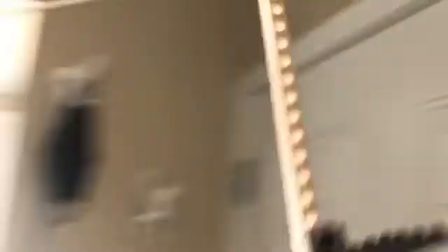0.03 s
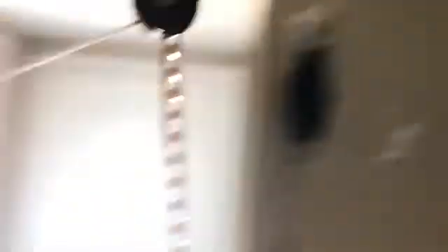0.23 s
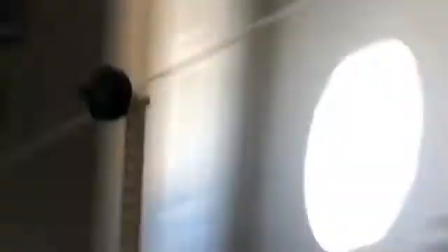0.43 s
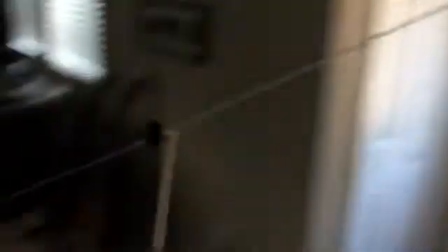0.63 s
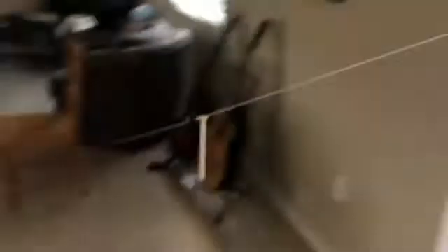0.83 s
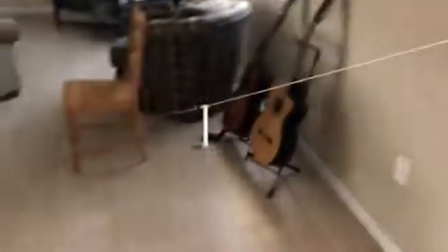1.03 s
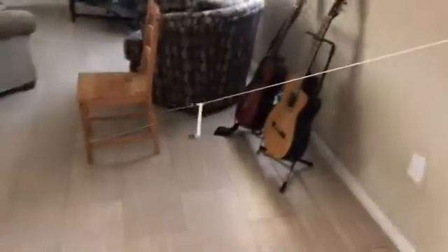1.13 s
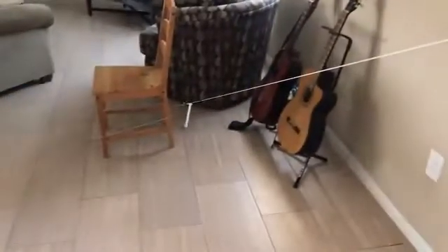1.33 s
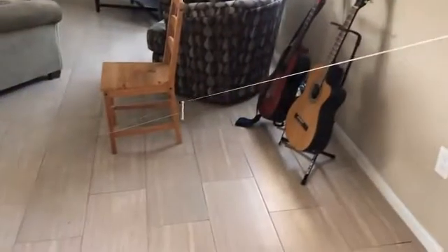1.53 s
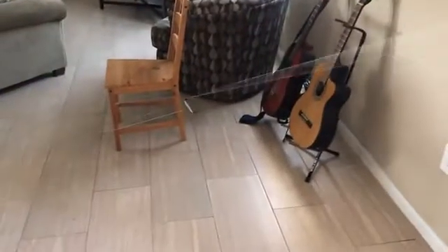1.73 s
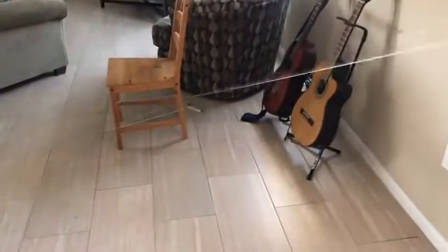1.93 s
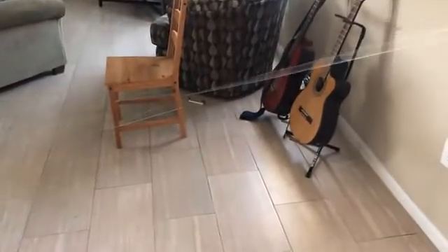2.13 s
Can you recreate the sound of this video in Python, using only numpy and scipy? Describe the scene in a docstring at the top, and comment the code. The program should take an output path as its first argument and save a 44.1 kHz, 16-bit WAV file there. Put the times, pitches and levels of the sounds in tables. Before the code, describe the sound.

Small pulley toy zips along a string with a faint rising whine, ending in sharp plastic clacks

```python
"""A plastic toy hangs from a small pulley and rolls down a taut string across a hard-floored room.
First the wheel whines, climbing in pitch, and the rubbed string sings; both are gliding sine tones.
Noise hisses in the groove near the microphone, and ticks ring the pulley; soft handling bumps intrude.
At 1.58 s the toy hits a wooden chair, then a piece clatters, rocks and rattles to rest on the floor:
decaying modes and noise cracks, followed by a diffuse room tail."""
import sys
import numpy as np
from scipy import signal
from scipy.fft import rfft, irfft
from scipy.io import wavfile

SR = 44100
rng = np.random.default_rng(int(sys.argv[2]) if len(sys.argv) > 2 else 0)


def transcribe(signal):
    """Save signal, clipped to [-1, 1], as a 16-bit WAV file at the path in sys.argv[1]."""
    frames = np.atleast_2d(signal).T
    limited = np.clip(frames, -1, 1)
    pcm = np.round(limited * 32767).astype(np.int16)
    wavfile.write(sys.argv[1], SR, pcm)


N = 95873
TIME = np.arange(N) / SR

# The wheel rubs its frame. Each row: centre in seconds, bell half length (sigma) in seconds, level in dB.
SCUFFS = [(0.279, 0.016, -57), (0.382, 0.0085, -51.5), (0.765, 0.014, -68), (.893, 0.015, -66),
          (1.207, 0.0058, -72), (1.352, 0.014, -69.5)]
# The toy strikes the chair. Each row: start in seconds, body level in dB, crack level in dB,
# lowest ringing frequency in Hz.
CHAIR_HITS = [(1.5800, -17, -28, 860), (1.5824, -18, -23, 2510), (1.5872, -31.5, -40, 908)]
# The loose piece clatters. Each row: start in seconds, body level in dB, crack level in dB,
# lowest ringing frequency in Hz.
FLOOR_HITS = [(1.8481, -26.5, -39, 810), (1.8505, -28.5, -35.5, 960), (1.8601, -47, -54, 1320),
              (1.871, -44, -32, 3000), (1.8735, -51, -30.5, 3000), (1.8778, -55, -40, 2960),
              (2.126, -62, -47, 3000)]
# Modes of the piece on the floor. Each row: frequency in Hz, relative level in dB, T60 in seconds.
FLOOR_MODES = [(1127, -16.5, 0.026), (1464, -8, 0.02), (2080, -14, 0.016), (2360, -8.5, 0.02),
               (2614, 1, 0.022), (3370, -13, 0.0096), (4100, -9.5, 0.025), (4440, -8, 0.012)]
# Colour of a contact on the floor. Each row: frequency in Hz, relative density in dB per Hz.
FLOOR_CRACK = [(100, -31), (800, -33), (2500, -1), (4500, 1.5), (6500, 0), (9500, -3), (13500, -3)]


def from_db(db):
    """Decibels to gain."""
    return 10 ** (np.asarray(db) / 20)


def rms_one(x):
    """Scale to unit power."""
    return x / np.sqrt(np.mean(x ** 2) + 1e-20)


def in_time(rows):
    """A control curve at every sample, straight between its points."""
    return np.interp(TIME, *np.transpose(rows))


def at_hz(points, hz):
    """Read a spectrum on a log-frequency axis."""
    f, value = np.transpose(points)
    return np.interp(np.log(hz + 1e-9), np.log(f), value)


def drift(rate_hz):
    """Smooth random wander of unit power: white noise through a two-pole low-pass."""
    r = np.exp(-2 * np.pi * rate_hz / SR)
    wander = signal.lfilter([1], [1, -2 * r, r * r], rng.standard_normal(2 * N))
    return rms_one(wander[N:])  # the first half lets the filter settle


def unsteady_tone(phase, rate_hz):
    """A tone whose two quadratures wander separately, so strength and phase both waver."""
    return drift(rate_hz) * np.sin(phase) + drift(rate_hz) * np.cos(phase)


def noise(spectrum):
    """Coloured stereo noise of unit power, nearly mono below the treble."""
    # Stereo width. Each row: frequency in Hz, side over mid in dB.
    width = [(3000, -26), (4500, -13), (8000, -9), (14000, -8)]
    hz = np.fft.rfftfreq(N, 1 / SR)
    mid, side = rfft(rng.standard_normal((2, N))) * from_db(at_hz(spectrum, hz))
    side = side * from_db(at_hz(width, hz))
    return rms_one(irfft([mid + side, mid - side], N))


def high_pass(x, hz, order=2):
    """Remove what lies below a frequency."""
    sos = signal.butter(order, hz, "high", fs=SR, output="sos")
    return signal.sosfilt(sos, x + 1e-18)


def swells(rows):
    """Brief bell-shaped swells, as a gain."""
    return sum(from_db(db) * np.exp(-.5 * ((TIME - s) / half) ** 2) for s, half, db in rows)


def since(start):
    """Seconds since a moment, zero before it."""
    return np.maximum(TIME - start, 0)


def dying(start, t60):
    """Exponential decay from a moment on."""
    return (TIME >= start) * from_db(-60 * since(start) / t60)


def ring(start, hz, t60):
    """A struck mode: a decaying sine."""
    return dying(start, t60) * np.sin(2 * np.pi * hz * (TIME - start))


def spread(x, width_db):
    """Widen or narrow a stereo sound by scaling its difference from the mid."""
    mid = x.mean(axis=0)
    return mid + from_db(width_db) * (x - mid)


def room_air():
    """Steady coloured room noise that fades in at the start."""
    # Colour of the air. Each row: frequency in Hz, relative density in dB per Hz.
    air_colour = [(25, -27), (60, 2.5), (100, -3.5), (200, -4.5), (500, -9.5), (1000, -12.5), (2500, -20),
                  (6000, -23.5), (14000, -38)]
    level_db, fade_s, start_offset_db = -66, 0.24, -14.5
    fade_db = start_offset_db * np.maximum(1 - TIME / fade_s, 0)
    return from_db(level_db + fade_db) * noise(air_colour)


def whine():
    """The wheel's gliding tone swells about once a turn, is roughened by the axle, and has a wall echo."""
    # Wheel speed as the pitch of its whine. Each row: time in seconds, pitch in Hz.
    pitch = [(0, 343), (.18, 484.5), (.4, 559), (.62, 808.5), (.79, 875), (.87, 1048), (.96, 1148),
             (1.14, 1151), (1.25, 1245), (1.34, 1330), (1.43, 1397), (1.58, 1365)]
    # Strength of the whine. Each row: time in seconds, level in dB.
    strength = [(0, -92), (.2, -71.5), (.38, -71.5), (.52, -76.5), (.66, -72), (.82, -73.5), (.91, -68),
                (.96, -62), (1.09, -71.5), (1.125, -61.5), (1.19, -69.5), (1.208, -52.5), (1.23, -64),
                (1.303, -67), (1.317, -55), (1.335, -64), (1.36, -57), (1.46, -68.5), (1.485, -61.5),
                (1.58, -65)]
    # Partials of the whine. Each row: multiple of the pitch, relative level in dB.
    partials = [(1, 0), (2, -18)]
    # The slow wheel runs raggedly, the fast one cleanly. Each row: time in seconds, phase jitter in rad.
    ragged = [(.7, 1.2), (.95, .3)]
    wobble, wobble_hz = 0.02405, 66.3  # relative pitch wander and its rate
    flutter_db, flutter_hz = 1.5, 37
    cycles_per_turn, turn_depth = 27, 0.69
    echo_s, echo_db = .028, -7

    hz = in_time(pitch) * (1 + wobble * drift(wobble_hz))
    phase = 2 * np.pi * np.cumsum(hz) / SR
    jitter = in_time(ragged)
    tone = 0
    for multiple, db in partials:
        gain = from_db(db + flutter_db * drift(flutter_hz))
        tone = tone + gain * np.sin(round(multiple) * phase + jitter * drift(53))
    turning = 1 + turn_depth * np.sin(phase / cycles_per_turn + drift(3.5))
    direct = tone * turning
    # the echo beats with the gliding whine
    echo = from_db(echo_db) * np.interp(TIME - echo_s, TIME, direct, left=0)
    return from_db(in_time(strength)) * rms_one(direct + echo)


def string_song(flicker_hz=15.7):
    """The taut string sings faintly under the wheel in two narrow, unsteady tones."""
    # A high and a low tone, each a list of rows. Each row: time in seconds, pitch in Hz, level in dB.
    string_tones = [
        [(0, 1369, -106), (.24, 1336, -79), (.36, 1305, -64), (.45, 1261, -68.5), (.7, 1235, -71.5),
         (.88, 1240, -76.5), (1.1, 1223, -65), (1.58, 1225, -79)],
        [(0, 465, -87.5), (.5, 497.4, -77), (1.1, 490, -83), (1.33, 463.7, -68.5), (1.45, 501.3, -68),
         (1.58, 511.4, -80)],
    ]
    out = 0
    for tone in string_tones:
        s, hz, db = np.transpose(tone)
        phase = 2 * np.pi * np.cumsum(np.interp(TIME, s, hz)) / SR
        out = out + from_db(np.interp(TIME, s, db)) * unsteady_tone(phase, flicker_hz)
    return out


def rolling():
    """The string's fibres tick under the wheel and ring the pulley, harder when the wheel rubs."""
    # Force of the rolling contact. Each row: time in seconds, level in dB.
    force = [(0, -104), (.15, -85), (.27, -79), (.4, -61.5), (.48, -69), (.7, -70.5), (.8, -71), (1, -72),
             (1.25, -68.5), (1.4, -65.5), (1.58, -67)]
    # Resonances of pulley and hanger. Each row: frequency in Hz, width in Hz, relative level in dB.
    pulley = [(470, 230, -19), (1288, 94, 2), (1810, 420, -5), (2640, 370, 2), (4120, 190, -8),
              (4340, 50, -7.5), (4910, 200, -5), (8100, 470, -12)]
    # The hanger rings in patches. Each row: centre in seconds, bell half length (sigma) in seconds,
    # level in dB.
    hanger_rings = [(.395, 0.0096, -64), (.655, 0.018, -70.5), (.79, 0.034, -71.5), (1.021, 0.0059, -66)]
    ticks_per_s, tick_spread_db = 1500, 0  # no spread: all ticks are equally strong
    flicker_db, flicker_hz = 2, 9.4
    rub_ring_db = -12.5  # pulley ringing relative to the rub's own noise
    hanger_hz, hanger_drift_hz = 2680, 36

    ticks = (rng.random(N) < ticks_per_s / SR) * rng.choice([-1, 1], N)
    ticks = ticks * from_db(tick_spread_db * np.minimum(rng.exponential(1, N), 4))
    body = 0
    for k, (hz, width, db) in enumerate(pulley):
        r = np.exp(-np.pi * width / SR)
        poles = [1, -2 * r * np.cos(2 * np.pi * hz / SR), r * r]
        mode = rms_one(signal.lfilter([1, 0, -1], poles, ticks))
        gain = from_db(db + flicker_db * drift(flicker_hz))
        body = body + (-1) ** k * gain * mode  # neighbours in opposite polarity
    drive = from_db(in_time(force)) + from_db(rub_ring_db) * swells(SCUFFS)
    hanger = unsteady_tone(2 * np.pi * hanger_hz * TIME, hanger_drift_hz)
    return drive * rms_one(body) + swells(hanger_rings) * hanger


def friction(flicker_db=1.0, flicker_hz=92):
    """Noise of the string hissing in the groove, with a few brief rubs, flickering in level."""
    # Hiss that fades with distance. Each row: time in seconds, level in dB.
    hiss_level = [(0, -82.5), (.1, -74), (.19, -63.5), (.32, -54.5), (.45, -59), (.6, -64), (.72, -68.5),
                  (1.1, -74), (1.4, -73.5), (1.58, -72)]
    # Colour of the hiss. Each row: frequency in Hz, relative density in dB per Hz.
    hiss_colour = [(200, -8), (1000, -8), (2000, -2), (3050, -5), (3500, -16), (3980, 5), (4200, 2.5),
                   (4880, 10.5), (5300, 6.5), (5850, -3), (6200, 5.5), (6700, -2.5), (7650, -4), (8100, 6),
                   (8600, -7), (9400, 0), (10450, 7.5), (11800, 8), (12450, 10), (13300, 4), (14000, 8.5)]
    # Colour of the rubs. Each row: frequency in Hz, relative density in dB per Hz.
    scuff_colour = [(400, -31), (1400, -21), (2000, -5), (2450, 3), (2700, 10), (2870, 0), (3050, 10),
                    (3450, -16), (3800, -1), (4000, 17), (4200, 5), (4430, 12), (4650, -4), (4900, 13.5),
                    (5400, 5), (6500, -2.5), (11000, 6), (14500, -1.5)]
    hiss = from_db(in_time(hiss_level)) * noise(hiss_colour)
    rubs = swells(SCUFFS) * noise(scuff_colour)
    return (hiss + rubs) * from_db(flicker_db * drift(flicker_hz))


def handling(rise_s=0.0014):
    """Dull bumps on the hand-held microphone: decaying low sines with softened onsets."""
    # Each row: start in seconds, frequency in Hz, level in dB, T60 in seconds.
    bumps = [(0.438, 98, -42.5, 0.05), (.475, 57, -60, 0.45), (0.621, 179, -49, 0.031),
             (2.008, 162, -60.5, 0.11), (2.06, 180, -43.5, 0.036)]
    out = 0
    for s, hz, db, t60 in bumps:
        onset = 1 - np.exp(-since(s) / rise_s)
        out = out + from_db(db) * ring(s, hz, t60) * onset
    return out


def clack(hits, modes, crack_colour, crack_t60):
    """Each contact cracks and rings the modes in its own way; harder, brighter ones ring only the higher."""
    detune = .006  # spread of a mode's pitch from contact to contact, as a share
    body, crack = 0, 0
    chance = rng.standard_normal((len(hits), len(modes), 3))
    for (s, body_db, crack_db, low_hz), draws in zip(hits, chance):
        crack = crack + from_db(crack_db) * dying(s, crack_t60)
        rings = 0
        for (hz, db, t60), (side, strength_db, shift) in zip(modes, draws):
            gain = np.sign(side) * from_db(body_db + db + strength_db)  # random polarity
            rings = rings + gain * ring(s, hz * (1 + detune * shift), t60)
        body = body + high_pass(rings, low_hz, order=3)
    return body + high_pass(crack * noise(crack_colour), hz=184)


def room(x, early_db, late_db, early_t60, build_s):
    """Near reflections, then a diffuse tail whose decay time varies with frequency."""
    # Decay of the room. Each row: frequency in Hz, T60 in seconds.
    room_t60 = [(100, 0.78), (260, 0.68), (700, 0.76), (1840, 0.98), (4850, 0.77), (8000, 0.5),
                (13000, 0.34)]
    # Colour of the reverberation. Each row: frequency in Hz, relative density in dB per Hz.
    room_colour = [(100, 18.5), (250, 16), (700, 3.5), (1500, -4), (3000, -6), (5000, -0.5), (9000, 0),
                   (14000, 1.5)]
    hz = np.fft.rfftfreq(N, 1 / SR)
    centres = np.log(np.array(room_t60)[:, 0])
    wash, tail = rfft(noise(room_colour)), 0
    # overlapping bands that sum to one, each with its own decay
    for share, (_, t60) in zip(np.eye(len(centres)), room_t60):
        band = irfft(wash * np.interp(np.log(hz + 1e-9), centres, share), N)
        tail = tail + band * dying(0, t60)
    tail = rms_one(tail * (1 - np.exp(-TIME / build_s)))
    early = rms_one(noise(room_colour) * dying(0.008, early_t60))
    response = (from_db(late_db) * tail + from_db(early_db) * early) / np.sqrt(N)
    return signal.fftconvolve(x, response, axes=-1)[:, :N]


def chair_blow(swell_s=0.046):
    """The toy stops against the chair: modes and cracks in the room; low tones swell and hang on."""
    # Modes of the blow. Each row: frequency in Hz, relative level in dB, T60 in seconds.
    chair_modes = [(930, -10.5, 0.03), (1074, -9.5, .05), (1395, -7, .035), (1730, 1.5, 0.017),
                   (2030, -6, 0.016), (2230, -8.5, 0.04), (2768, -4, 0.025), (3133, -6.5, 0.02),
                   (3160, -3.5, 0.013), (3603, -4, 0.019), (4050, -11.5, 0.015), (4374, -9.5, 0.019),
                   (5110, -15.5, 0.023), (5300, -27, 0.017)]
    # Colour of the crack. Each row: frequency in Hz, relative density in dB per Hz.
    chair_crack = [(40, -30), (150, -18), (280, -13), (350, -5.5), (430, 1), (650, -4), (1200, 5.5),
                   (2000, 6.5), (3400, 13), (4200, 1), (6000, -0.5), (10000, -2), (14500, -14.5)]
    # Low tones of chair and room. Each row: frequency in Hz, level in dB, T60 in seconds.
    low_ring = [(196, -50.5, 0.64), (211.4, -39.5, 0.38), (352.5, -44.5, 0.51), (531, -41, 0.38),
                (916, -48, 0.55)]
    hit = clack(CHAIR_HITS, chair_modes, chair_crack, crack_t60=0.026)
    start = CHAIR_HITS[0][0]
    low = sum(from_db(db) * ring(start, hz, t60) for hz, db, t60 in low_ring)
    low = low * (1 - np.exp(-since(start) / swell_s))
    return hit + low + room(hit, early_db=-8, late_db=-1.0, early_t60=0.27, build_s=0.0021)


def floor_clatter():
    """A piece lands on the hard floor, end after end, heard mostly through the room."""
    hit = clack(FLOOR_HITS, FLOOR_MODES, FLOOR_CRACK, crack_t60=0.021)
    return hit + room(hit, early_db=-2.5, late_db=3.0, early_t60=0.092, build_s=0.035)


def rocking():
    """The fallen piece rocks on the floor and keeps its strongest mode ringing: a decaying unsteady tone."""
    level_db, mode_hz, drift_hz, t60_s = -45, 2635, 110, 0.67
    wave = unsteady_tone(2 * np.pi * mode_hz * TIME, drift_hz)
    return from_db(level_db) * dying(FLOOR_HITS[0][0], t60_s) * wave


def settling():
    """The piece rattles softly to rest: many tiny touches ring its modes, with a noise rustle."""
    # Strength of the rattle. Each row: time in seconds, level in dB.
    strength = [(1.88, -94), (1.93, -58), (1.99, -55.5), (2.04, -61.5), (2.11, -58.5), (2.13, -57.5),
                (2.17, -60)]
    touches_per_s, body_low_hz = 970, 820
    rustle_db, uneven_db = 3, 3  # rustle over rattle; wander of the rustle
    touches = (rng.random(N) < touches_per_s / SR) * rng.standard_normal(N)
    body = sum(from_db(db) * ring(0, hz, t60) for hz, db, t60 in FLOOR_MODES)
    rattle = rms_one(high_pass(signal.fftconvolve(touches, body)[:N], body_low_hz))
    rustle = rms_one(noise(FLOOR_CRACK) * from_db(uneven_db * drift(70)))
    level = (TIME > strength[0][0]) * from_db(in_time(strength))
    return level * (rattle + from_db(rustle_db) * rustle)


def scene():
    """The ride, dying away from the blow on, then the chair and floor contacts, over quiet room noise."""
    spin_down_t60_s, chair_width_db, floor_width_db = 0.76, -4, 2
    spinning = from_db(-60 * since(CHAIR_HITS[0][0]) / spin_down_t60_s)
    air = room_air()
    ride = spinning * (whine() + string_song() + rolling() + friction())
    chair = spread(chair_blow(), chair_width_db)
    floor = spread(floor_clatter() + settling() + rocking(), floor_width_db)
    return ride + chair + floor + handling() + air


def record(dry):
    """The microphones give width only in the treble; the top is cut steeply."""
    mono_below_hz, cutoff_hz = 4300, 14300
    mid = (dry[0] + dry[1]) / 2
    side = high_pass((dry[0] - dry[1]) / 2, mono_below_hz, order=8)
    top_cut = signal.ellip(10, .1, 70, cutoff_hz, fs=SR, output="sos")  # ripple and stop band in dB
    return signal.sosfilt(top_cut, [mid + side, mid - side])


dry = scene()
out = record(dry)
transcribe(out)
```